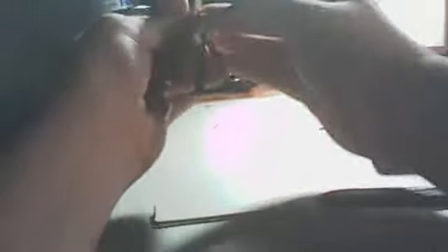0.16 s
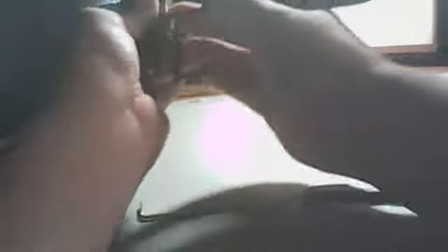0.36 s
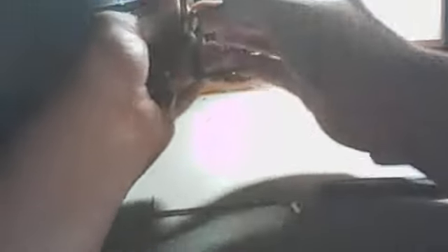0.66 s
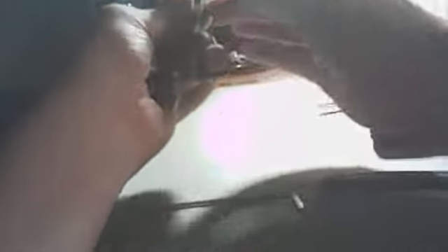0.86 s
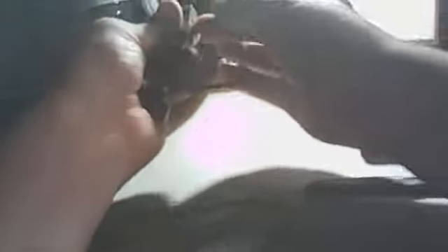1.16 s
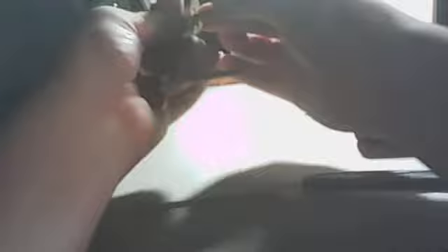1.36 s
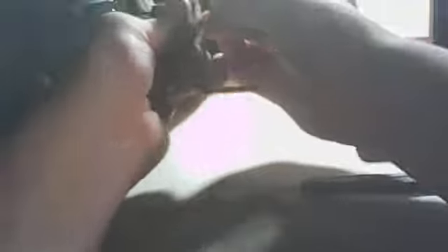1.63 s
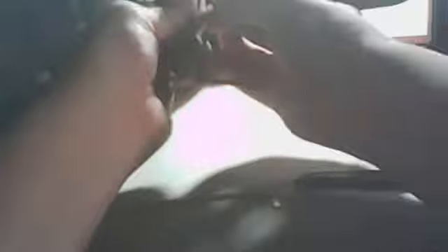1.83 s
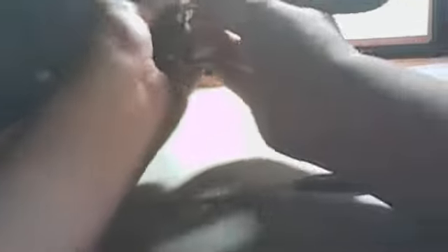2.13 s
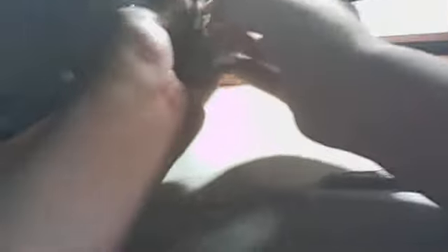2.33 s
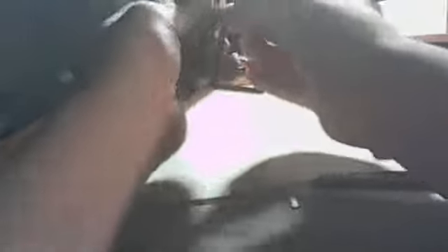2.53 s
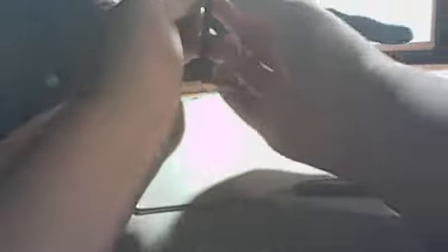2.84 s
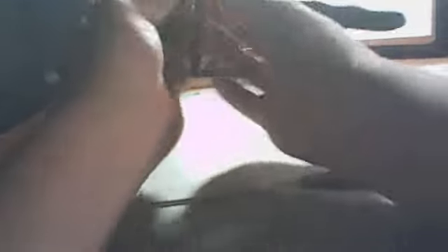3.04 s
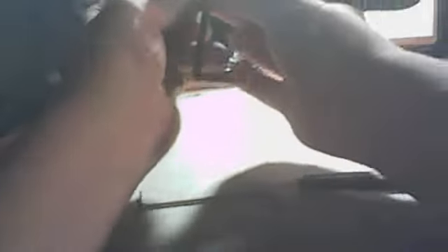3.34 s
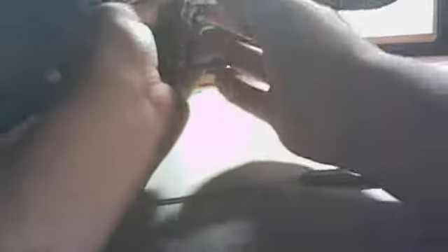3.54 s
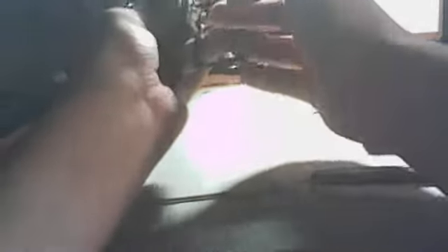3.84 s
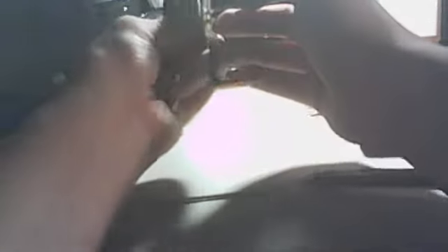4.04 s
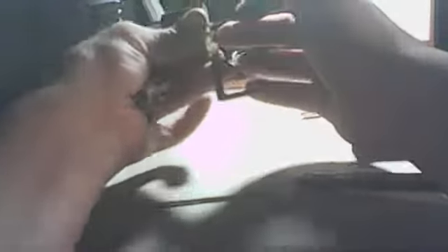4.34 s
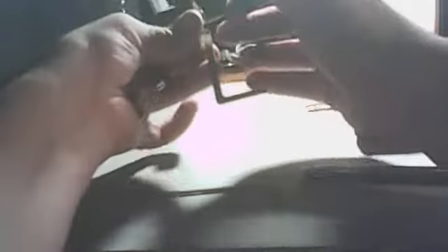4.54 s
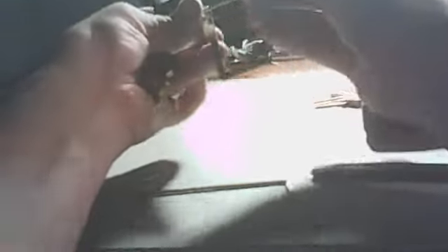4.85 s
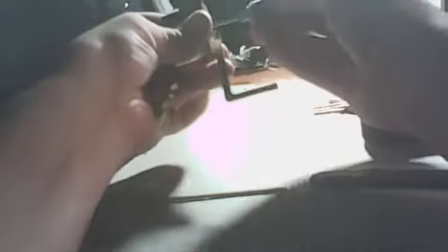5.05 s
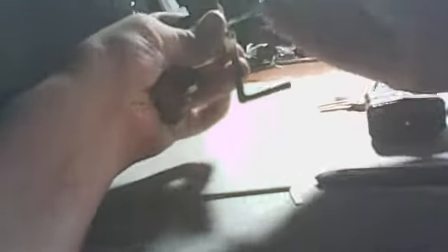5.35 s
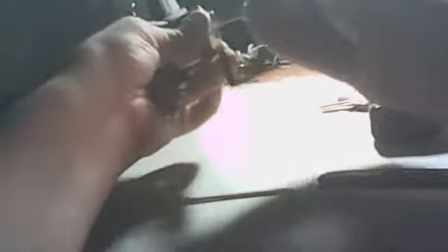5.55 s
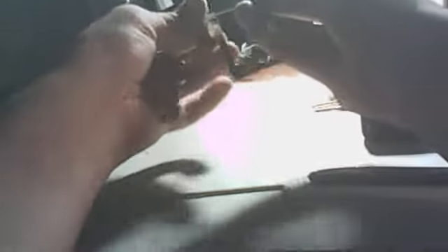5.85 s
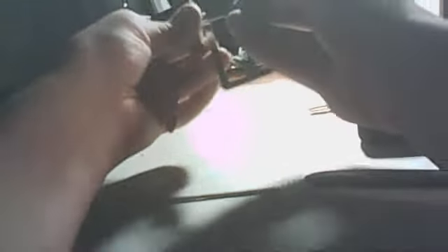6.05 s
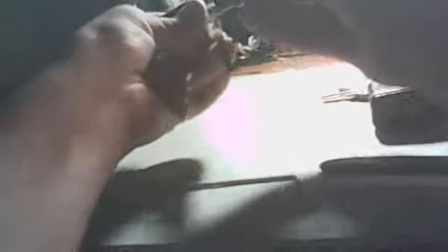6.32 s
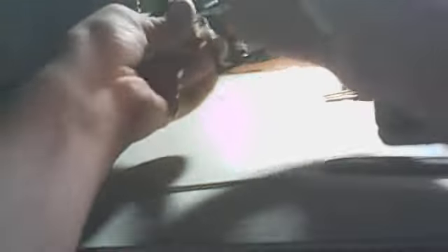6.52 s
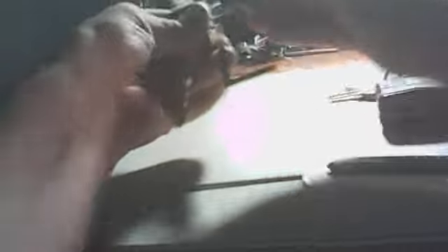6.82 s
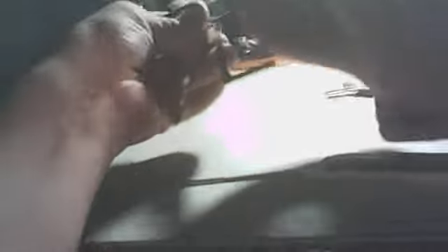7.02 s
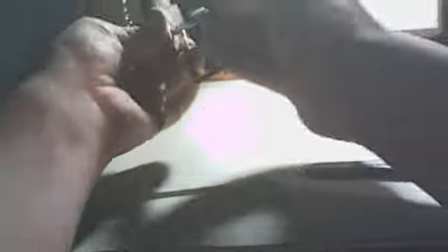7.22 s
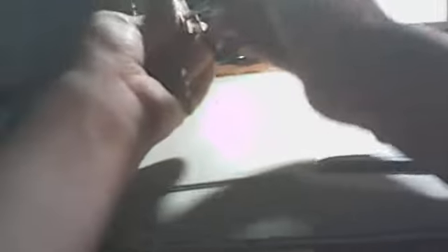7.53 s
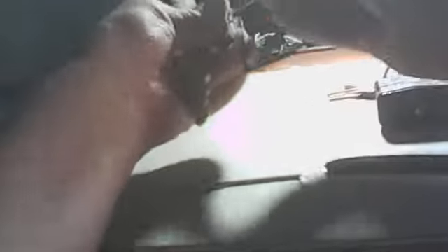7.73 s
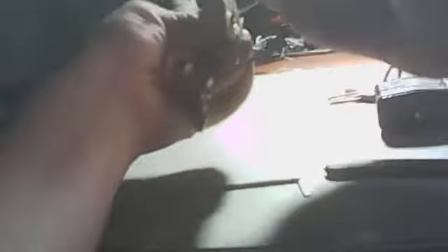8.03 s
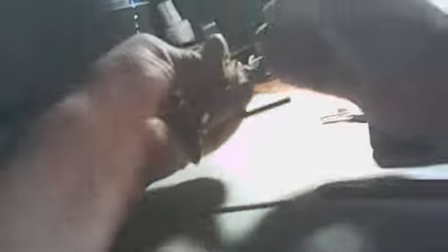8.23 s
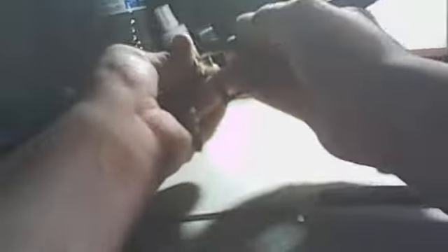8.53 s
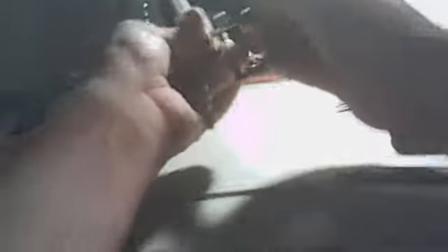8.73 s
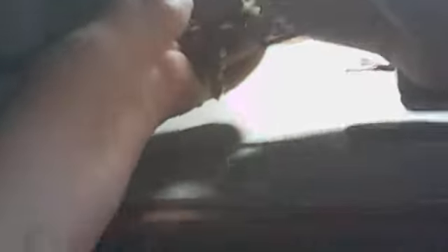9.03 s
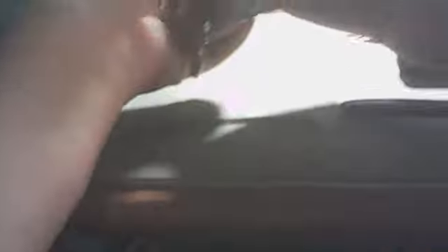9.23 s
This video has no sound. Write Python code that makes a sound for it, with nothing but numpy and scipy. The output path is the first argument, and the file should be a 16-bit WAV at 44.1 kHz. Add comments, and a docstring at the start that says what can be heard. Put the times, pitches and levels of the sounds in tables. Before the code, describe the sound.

Close, irregular metal clicks, brief scratches and tiny pings of lock picking, with a soft desk bump and quiet room hum.

```python
"""Picking a lock over a desk

A small room, one microphone close to the hands. A steel pick and a tension wrench work a hand-held
lock: pins snap and tick, and the pick scrapes, sings thinly and pings as it springs free. Fingers rub
the lock and bump the desk. Behind them are a computer fan, mains hum and faint microphone hiss."""
import sys
import numpy as np
from scipy import signal
from scipy.fft import rfft, irfft, next_fast_len
from scipy.io import wavfile
from scipy.ndimage import map_coordinates

SR = 44100
rng = np.random.default_rng(int(sys.argv[2]) if len(sys.argv) > 2 else 0)


def generate_wav(signal):
    """Clip the signal to [-1, 1] and save it as 16-bit WAV at the path in sys.argv[1]."""
    frames = np.transpose(np.atleast_2d(signal))
    scaled = np.clip(frames, -1, 1) * 32767
    pcm = np.round(scaled).astype(np.int16)
    wavfile.write(sys.argv[1], SR, pcm)


N = 413658
TIME = np.arange(N) / SR
AGE = np.arange(SR // 3) / SR  # seconds since a contact
LEAD_IN_SAMPLES = SR // 400  # a very short swell of noise that softens each click's attack


def amp(db):
    """Decibels to gain."""
    return 10 ** (np.asarray(db) / 20)


def unit(x):
    """Scale to rms 1."""
    return x / np.sqrt(np.mean(x ** 2) + 1e-20)


def along(points, hz):
    """(frequency, value) points read on a log axis."""
    freqs, values = np.transpose(points)
    return np.interp(np.log(hz + 1e-9), np.log(freqs), values)


def wobble(knots_per_s, size=N):
    """A smooth random curve."""
    knots = rng.standard_normal(int(size * knots_per_s / SR) + 4)
    grid = np.arange(0, len(knots), 1 / 8)
    return np.interp(np.arange(size) * knots_per_s / SR, grid, map_coordinates(knots, [grid]))


def swell(t, half_length_s):
    """A bell-shaped rise and fall around t = 0."""
    return np.exp(-.5 * (t / half_length_s) ** 2)


def coloured(x, spectrum):
    """x shaped by (freq_hz, gain_db) points, at rms 1."""
    size = next_fast_len(len(x) + 8192)
    gain = amp(along(spectrum, np.fft.rfftfreq(size, 1 / SR)))
    return unit(irfft(rfft(x, size) * gain, size)[:len(x)])


def band(hz, width_hz, size=N):
    """A resonance kept sounding by noise, at rms 1."""
    padded = next_fast_len(size)
    peak = 1 / (1 + ((np.fft.rfftfreq(padded, 1 / SR) - hz) / width_hz) ** 2)
    return unit(irfft(rfft(rng.standard_normal(padded)) * peak, padded)[:size])


def minimum_phase(gain):
    """The sharpest-starting impulse response with this gain."""
    cepstrum = irfft(np.log(np.maximum(gain, 1e-6)))
    cepstrum[1:len(cepstrum) // 2] *= 2
    cepstrum[len(cepstrum) // 2 + 1:] = 0
    return irfft(np.exp(rfft(cepstrum)))


def ring(modes, gains, attack_s):
    """Decaying modes, their balance varying from blow to blow."""
    hz, db, t60 = np.transpose(modes)[:, :, None]
    level = gains[:, None] * amp(db + rng.normal(0, 3.6, db.shape) - 60 * AGE / t60)
    phase = 2 * np.pi * (hz * AGE + rng.random(hz.shape))
    return (level * np.sin(phase)).sum(0) * (1 - np.exp(-AGE / attack_s))


def add(track, start_s, sound):
    """Mix a sound into the track."""
    part = track[max(round(start_s * SR), 0):][:len(sound)]
    part += sound[:len(part)]


# The small room's decay: freq_hz, t60_s
ROOM_DECAY = [(200, 0.3), (2500, 0.21), (5000, 0.16), (14000, 0.078)]


def in_room(sound, wet_db, echo_db=-3, echo_s=0.01, spread_s=0.0035):
    """At the microphone: the direct sound, echoes off desk and window, and the room's short tail."""
    hz, t, noise = signal.stft(rng.standard_normal(len(AGE)), SR, nperseg=256)
    decay = amp(-60 * t / along(ROOM_DECAY, hz)[:, None])
    tail = signal.istft(noise * decay, SR, nperseg=256)[1][:len(AGE)]
    tail *= 1 - np.exp(-AGE / 0.00081)
    echoes = rng.standard_normal(len(AGE)) * np.exp(-((AGE - echo_s) / spread_s) ** 2)
    response = amp(wet_db) * (tail / np.linalg.norm(tail) + amp(echo_db) * echoes / np.linalg.norm(echoes))
    response[0] += 1  # direct path
    return signal.fftconvolve(sound, response)


# Air rushing through the fan: freq_hz, gain_db
FAN_AIR = [(20, -9.5), (95, -11.5), (150, -5), (250, -1.5), (320, -0.5), (380, -4), (560, -3), (640, -6),
           (900, -9.5), (1200, -15.5), (1650, -18), (2100, -29.5), (4000, -55)]
# Room resonances that the rush keeps alive: pitch_hz, width_hz, level_db
ROOM_MODES = [(155.5, 5.4, -68.5), (274.4, 6.5, -72), (347.5, 20, -64), (412.5, 14, -67), (954, 20, -72)]
# The fan's tones: pitch_hz, relative_db
FAN_TONES = [(160, -69), (199.5, -67), (317.6, -64.5), (447, -72.5), (596.5, -61.5), (663, -64.5),
             (829.5, -67), (937, -75.5), (1490, -78), (1590, -78.5)]


def fan(air_db=-54, tones_db=-1, drift_hz=1.57):
    """A computer fan in the background: rushing air, coloured by the room, and unsteady tones."""
    air = amp(air_db + 0.076 * wobble(5)) * coloured(rng.standard_normal(N), FAN_AIR)
    air += sum(amp(db) * band(hz, width) for hz, width, db in ROOM_MODES)
    tones = np.zeros(N)
    for hz, db in FAN_TONES:
        phase = 2 * np.pi * np.cumsum(hz + drift_hz * wobble(12)) / SR
        tones += amp(db + wobble(6.3)) * np.sqrt(2) * np.sin(phase)
    return air + amp(tones_db) * tones


# The microphone's noise floor: freq_hz, gain_db
HISS_SPECTRUM = [(1200, -25), (2100, -4), (3300, -3), (4300, 0.5), (5500, -9.5), (7000, -11.5), (9100, -18),
                 (11500, -11.5), (15500, -13.5)]


def microphone_hiss(level_db=-64.5):
    """The microphone's own faint, steady noise."""
    return amp(level_db) * coloured(rng.standard_normal(N), HISS_SPECTRUM)


def mains_hum(pitch_hz=120, level_db=-71, rise_db=4, rise_at_s=5.1, rise_s=.4):
    """The power supply hums at twice the line frequency, a little louder in the second half."""
    db = level_db + rise_db * np.clip((TIME - rise_at_s) / rise_s + .5, 0, 1)
    return amp(db) * np.sqrt(2) * np.sin(2 * np.pi * pitch_hz * TIME)


# The hand-damped lock body: pitch_ratio, gain_db
BODY_SPECTRUM = [(.04, -39), (.2, -13), (.4, -14.5), (.56, -15.5), (.72, -3), (.82, -11), (1, -1), (1.1, 0),
                 (1.22, -8), (1.7, -35)]
# The pins: pitch_ratio, gain_db
PIN_SPECTRUM = [(.33, -59), (.7, -15.5), (.84, -7.5), (1, -1), (1.08, -5.5), (1.19, -9), (1.34, -16),
                (2, -39)]
# The sharp edge of the contact: freq_hz, gain_db
EDGE_SPECTRUM = [(4000, -20), (6600, -2.5), (7600, -5), (8500, -4), (9700, -10.5), (13300, -15),
                 (16000, -30)]


def click(db, body_db, body_hz, hardness_db,
          lead_in_db=-12, lead_in_s=0.0005, chatter_db=-8, chatter_t60=0.016):
    """A snap, softened by a very short swell of noise, rings the lock; the pin chatters as it settles."""
    hz = np.fft.rfftfreq(2048, 1 / SR)
    # A harder contact is shorter: its edge is louder and brighter, and it favours higher pin modes.
    pin_hz = 4770 + 16 * hardness_db
    tilt_db = (4.5 + 0.57 * hardness_db) * np.log2(np.maximum(hz, 6500) / 6500)
    ripple = amp(2.2 * np.tanh(wobble(2200, size=len(hz))))  # each contact point favours other modes
    body = unit(ripple * amp(along(BODY_SPECTRUM, hz / body_hz)))
    pins = unit(ripple * amp(along(PIN_SPECTRUM, hz / pin_hz)))
    edge = unit(ripple * amp(along(EDGE_SPECTRUM, hz) + tilt_db))
    gain = np.sqrt(pins ** 2 + (amp(body_db) * body) ** 2 + (amp(hardness_db) * edge) ** 2)
    lock = minimum_phase(gain)
    lead_in = rng.standard_normal(LEAD_IN_SAMPLES) * np.exp(-AGE[:LEAD_IN_SAMPLES] / lead_in_s)[::-1]
    lead_in *= amp(lead_in_db) / np.linalg.norm(lead_in)
    chatter = rng.standard_normal(len(lock)) ** 3 * amp(-60 * AGE[:len(lock)] / chatter_t60)
    chatter *= amp(chatter_db) / np.linalg.norm(chatter)
    excitation = np.r_[lead_in, 1, chatter]
    snap = unit(signal.fftconvolve(lock, excitation)[:len(lock)]) * np.sqrt(np.mean(gain ** 2))
    return in_room(amp(db) * snap, wet_db=-13.5)


# Snaps in the lock, its body tuned by the grip: start_s, level_db, body_db, body_hz, hardness_db
PIN_SNAPS = [(0.0313, -34, -17.5, 1790, -9), (0.104, -59, -15, 2600, -15), (0.277, -67, -15, 2700, -9),
             (0.4, -38, -14.5, 2340, -12), (0.621, -67.5, -13.5, 2100, -5.5), (0.7588, -46, -8, 2840, -13),
             (0.7677, -50, -10, 2900, -12), (0.7734, -46, -5, 2420, -11), (1.371, -59, -12, 2600, -7.5),
             (1.4333, -51, 3.5, 2800, -11), (1.6188, -70, 3, 2560, -14), (2.1416, -59, -5, 2700, -6.5),
             (2.2973, -54, -7, 2720, -15), (2.3096, -49, -7, 2670, -18), (2.318, -60, -8, 3000, -11),
             (2.8747, -63.5, -11, 2250, -22), (3.053, -66.5, -16, 1900, -8), (3.1115, -67.5, 7, 2870, -9),
             (3.347, -69.5, 2, 2900, -10), (4.8998, -48, 0, 2570, -9), (5.1492, -63, 1, 2600, -13),
             (5.2813, -61.5, -9, 2450, -16), (5.5526, -66.5, -0.5, 2100, -9),
             (5.7676, -55.5, -11, 2560, -2), (5.8384, -47, -18, 2660, 1), (5.995, -66, -16, 2700, -9),
             (6.5932, -35.5, -10, 2700, -5), (6.7747, -29.5, -9.5, 2380, -18.5),
             (6.7908, -48, -9, 2540, -8), (6.919, -58.5, -17, 2400, -18), (7.037, -62, 1, 2370, -18),
             (7.0717, -59.5, -13, 2320, -7), (7.1447, -53, -6, 2680, -6), (7.5698, -51.5, -3.5, 2390, -9),
             (7.6246, -66.5, 4, 2330, -6), (8.3078, -63, -7, 2400, -8), (8.707, -51, -4, 2730, -11),
             (8.7391, -54, -8.5, 2500, -12), (9.199, -58, 3, 2290, -40), (9.247, -70, 8, 2320, -20),
             (9.316, -56.5, -8.5, 2400, -32), (9.361, -57.5, -0.5, 2140, -22)]


def pin_clicks():
    """Pins set and spring back, close and clear."""
    out = np.zeros(N)
    for start_s, db, body_db, body_hz, hardness_db in PIN_SNAPS:
        add(out, start_s - LEAD_IN_SAMPLES / SR, click(db, body_db, body_hz, hardness_db))
    return out


# Slow strokes of the pick along the pins: middle_s, level_db, half_length_s
PICK_STROKES = [(0.294, -68, .07), (2.02, -74.5, .1), (2.951, -72, .15), (5.2, -74, .28),
                (6.795, -67.5, .34), (8.269, -63.5, .13), (9.279, -67.5, .22)]


def effort(rest_db=-84.5):
    """How strongly the pick works, as a gain; the tip never quite stops moving."""
    power = sum((amp(db) * swell(TIME - middle_s, half_s)) ** 2 for middle_s, db, half_s in PICK_STROKES)
    return np.sqrt(amp(rest_db) ** 2 + power)


# Steel grating on brass: freq_hz, gain_db
FRICTION_SPECTRUM = [(1000, -30), (2100, -20), (2600, -10), (3100, -8.5), (3900, 0.5), (4600, 0),
                     (5500, -10), (6900, -17.5), (9400, -40), (14000, -37)]


def probing(slips_per_s=220, scatter_db=5):
    """Tiny random slips of the pick tip as it feels along the pins."""
    slips = rng.random(N) < slips_per_s / SR
    strength = amp(scatter_db * np.clip(rng.standard_normal(N), -2, 2))
    return in_room(effort() * coloured(slips * strength, FRICTION_SPECTRUM), wet_db=-2.5)[:N]


def pin_ticks(count=16, level_db=-70, scatter_db=3):
    """Pins brushed in passing tick faintly, more often during a stroke."""
    out = np.zeros(N)
    travel = np.cumsum(effort())
    starts = np.interp((np.arange(count) + rng.random(count)) / count, travel / travel[-1], TIME)
    for start_s, (louder, hollower, harder) in zip(starts, scatter_db * rng.standard_normal((count, 3))):
        tick = click(level_db + louder, body_db=-8 + 2 * hollower, body_hz=2400, hardness_db=-14 + harder)
        add(out, start_s, tick)
    return out


# The pick drags along the keyway: start_s, level_db, rise_s, t60_s
KEYWAY_DRAGS = [(0.767, -40, .002, 0.046), (2.309, -61, .002, .04), (6.321, -31, 0.00086, 0.16),
                (6.798, -35, .002, 0.03023)]


def pick_scrapes(sing_hz=3950, sing_width_hz=130, sing_db=-5):
    """Steel catches and slips on brass in a quick dying run, and the pick sings along."""
    out = np.zeros(N)
    for start_s, db, rise_s, t60 in KEYWAY_DRAGS:
        envelope = (1 - np.exp(-AGE / rise_s)) * amp(-60 * AGE / t60)
        grating = coloured(rng.standard_normal(len(AGE)), FRICTION_SPECTRUM)
        singing = amp(sing_db) * band(sing_hz, sing_width_hz, size=len(AGE))
        add(out, start_s, in_room(amp(db) * envelope * unit(grating + singing), wet_db=-18.5))
    return out


# The pick drags under tension: start_s, level_db, length_s
TENSE_DRAGS = [(1.913, -66.5, .38), (4.92, -74, .55)]


def pick_squeaks(pitch_hz=2830, width_hz=90, rise_s=0.028, sag_db_per_s=14, release_s=.05):
    """Friction excites one narrow mode of the pick: it catches quickly, fades a little and lets go."""
    envelope = np.zeros(N)
    for start_s, db, length_s in TENSE_DRAGS:
        catch = np.clip((TIME - start_s) / rise_s, 0, 1)
        release = np.clip((start_s + length_s - TIME) / release_s + 1, 0, 1)
        envelope += catch * release * amp(db - sag_db_per_s * np.clip(TIME - start_s, 0, length_s))
    return envelope * band(pitch_hz, width_hz)


# The steel pick's modes: pitch_hz, gain_db, t60_s
PICK_MODES = [(2616, -7, .1), (4400, 5, 0.086), (4800, -6, .07), (8572.6, -19, 0.07), (10300, -6.5, 0.041),
              (12900, -3, 0.036)]
# The pick springs free: start_s, level_db, low_modes_db
PICK_RELEASES = [(3.053, -61, -8), (5.712, -61, -14), (6.002, -63, -1), (6.626, -47.5, -2.5),
                 (6.799, -40.5, -11), (7.073, -52, -8), (8.302, -51.5, -9)]


def pick_pings(rasp_db=-3, rasp_t60=0.016):
    """The thin pick rasps off a pin and rings briefly between the fingers, close and almost dry."""
    out = np.zeros(N)
    is_low = np.transpose(PICK_MODES)[0] < 6000
    for start_s, db, low_modes_db in PICK_RELEASES:
        bright_noise = coloured(rng.standard_normal(len(AGE)), [(3000, -14), (12500, -2), (16000, -10)])
        rasp = amp(rasp_db - 60 * AGE / rasp_t60) * bright_noise
        ringing = ring(PICK_MODES, amp(low_modes_db * is_low), attack_s=0.0004305)
        add(out, start_s, in_room(amp(db) * (rasp + ringing), wet_db=-28.5))
    return out


# The desk under the lock: pitch_hz, gain_db, t60_s
DESK_MODES = [(158.5, -9.5, 0.13), (205, -11.5, 0.18), (330, 0, 0.054), (453, -7, 0.036), (603, 4, 0.027),
              (800, -10, 0.041)]
# A hand meets the desk: start_s, level_db, tilt_db_per_octave
HAND_BUMPS = [(4.921, -37, 7), (4.934, -36, -4), (5.016, -56, -16), (6.404, -43.5, 1)]


def desk_bumps():
    """Soft blows of a hand ring the desk's low modes, with plenty of room around them."""
    out = np.zeros(N)
    octaves = np.log2(np.transpose(DESK_MODES)[0] / 350)
    for start_s, db, tilt in HAND_BUMPS:
        thud = ring(DESK_MODES, amp(tilt * octaves), attack_s=0.0015)
        add(out, start_s, in_room(amp(db) * thud, wet_db=-5))
    return out


# Fingers shift their grip and nudge the lock: middle_s, level_db, half_length_s, pitch_hz
GRIP_SHIFTS = [(5.339, -47, .028, 765), (6.408, -52.5, 0.01242, 960), (8.219, -61.5, 0.13, 1100),
               (9.064, -49.5, 0.024, 790), (9.151, -53, 0.028, 830), (9.204, -43, 0.01, 960),
               (9.372, -42.5, 0.016, 574)]


def finger_rubs(width_ratio=0.32):
    """Skin rubs the cupped lock into one dull resonance."""
    out = np.zeros(N)
    t = np.arange(-SR // 4, SR // 4) / SR
    for middle_s, db, half_s, hz in GRIP_SHIFTS:
        add(out, middle_s + t[0], amp(db) * swell(t, half_s) * band(hz, width_ratio * hz, size=len(t)))
    return out


def scene():
    """The lock, the hands and the room at one microphone."""
    lock = pin_clicks() + pick_pings() + pick_scrapes() + pick_squeaks() + probing()
    hands = desk_bumps() + finger_rubs()
    background = fan() + microphone_hiss() + mains_hum()
    return (lock + pin_ticks() + hands + background)[None]


def record(dry, top_hz=16000):
    """The recorder keeps nothing above its band limit."""
    size = next_fast_len(N + SR // 2)
    passband = np.fft.rfftfreq(size, 1 / SR) < top_hz
    return irfft(rfft(dry, size) * passband, size)[:, :N]


dry = scene()
out = record(dry)
generate_wav(out)
```